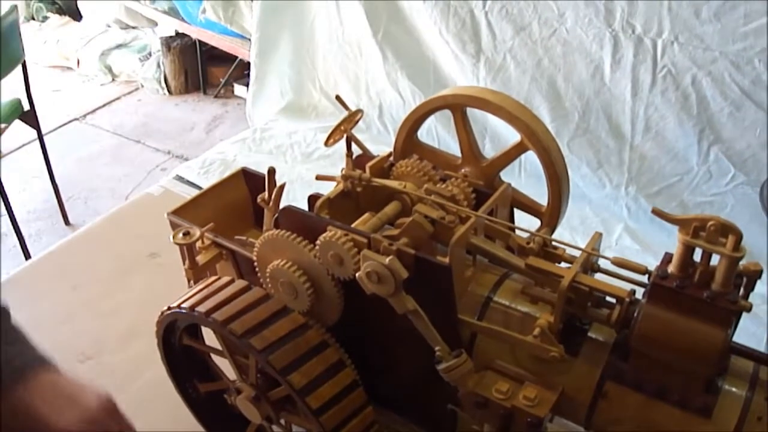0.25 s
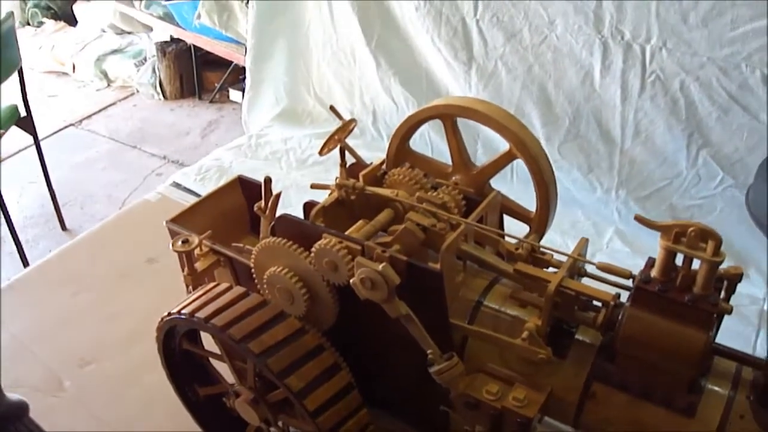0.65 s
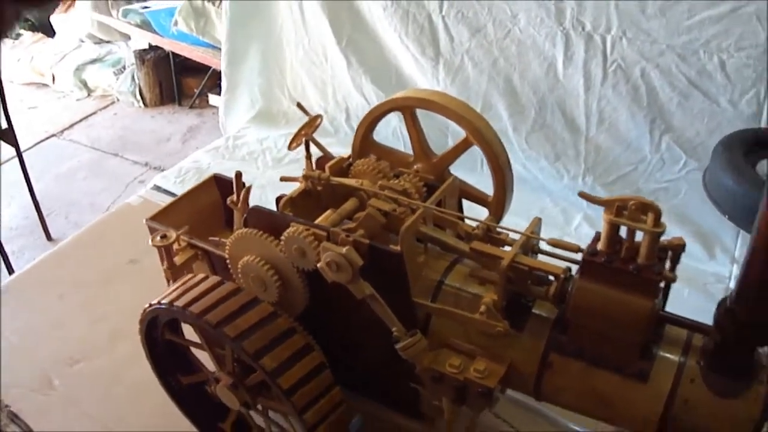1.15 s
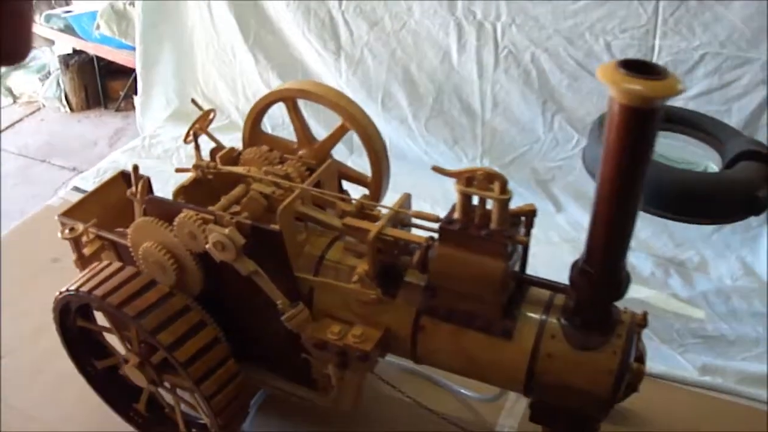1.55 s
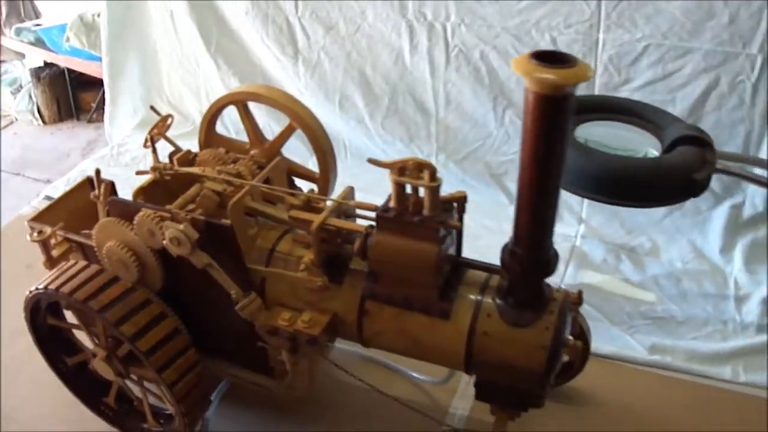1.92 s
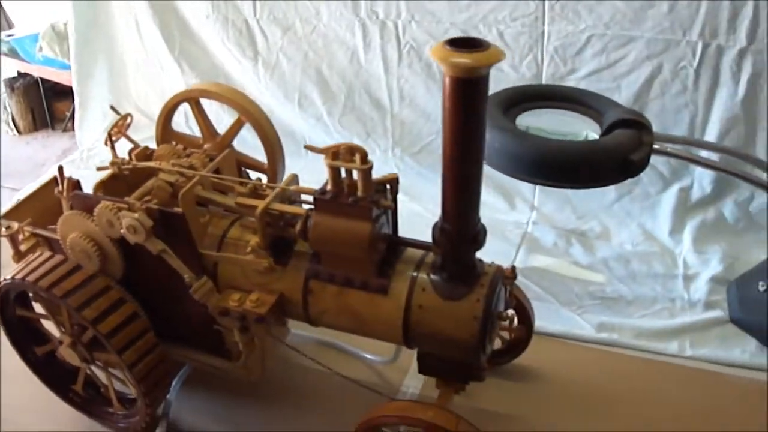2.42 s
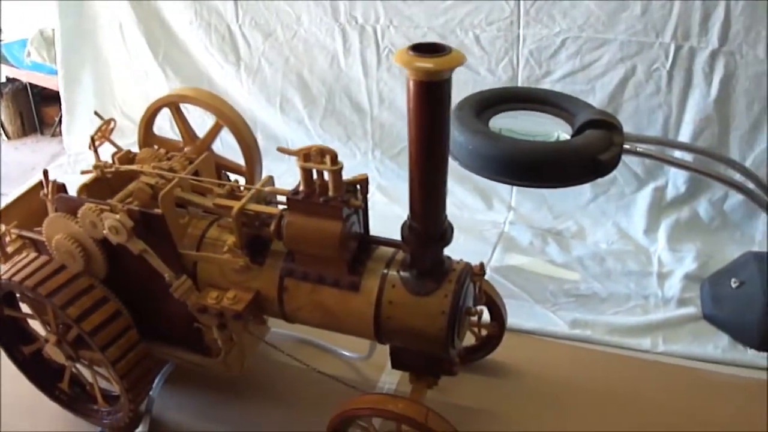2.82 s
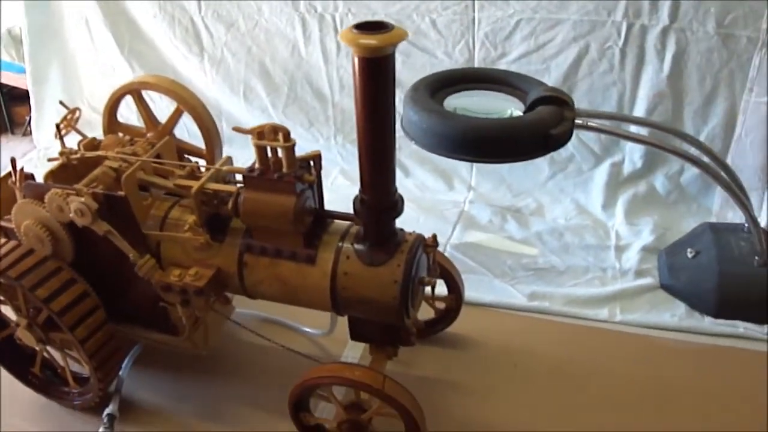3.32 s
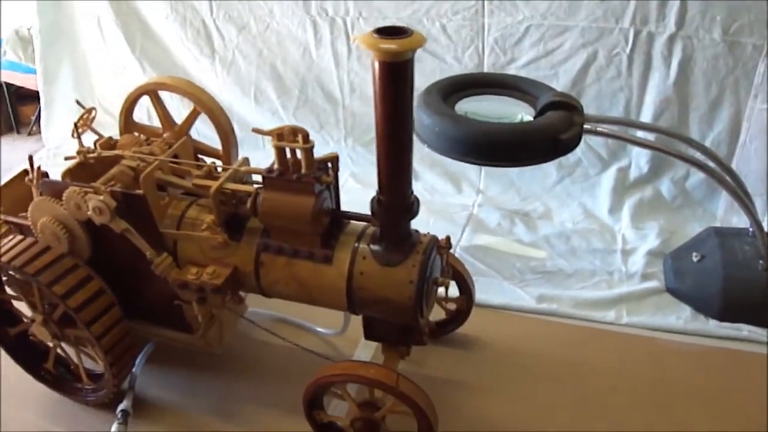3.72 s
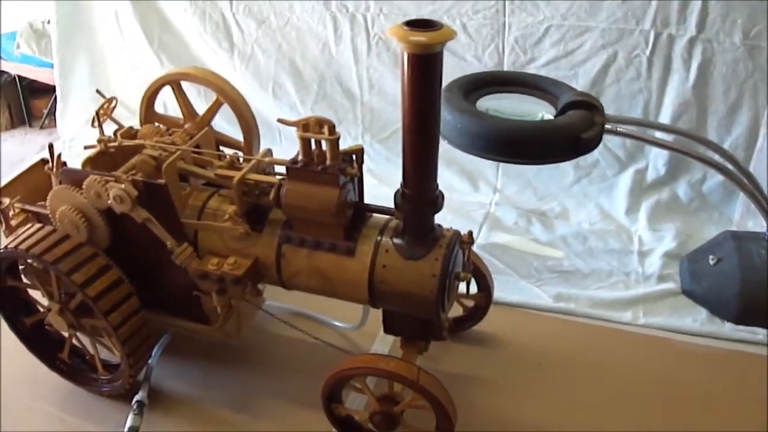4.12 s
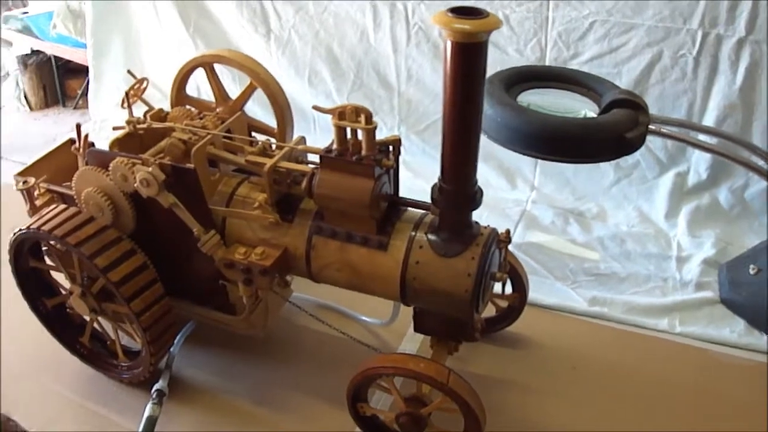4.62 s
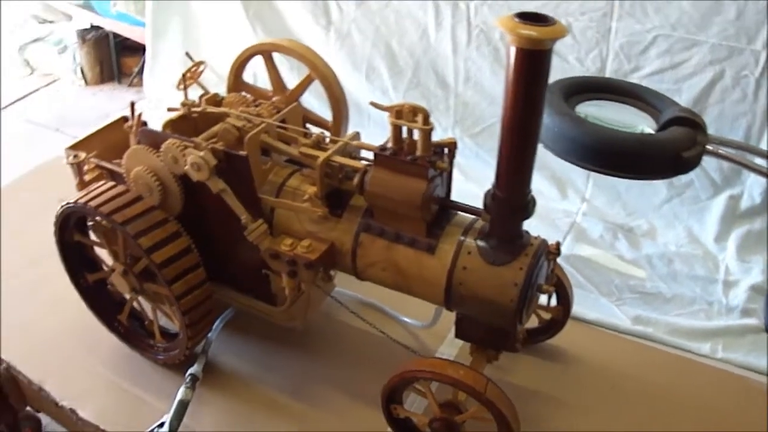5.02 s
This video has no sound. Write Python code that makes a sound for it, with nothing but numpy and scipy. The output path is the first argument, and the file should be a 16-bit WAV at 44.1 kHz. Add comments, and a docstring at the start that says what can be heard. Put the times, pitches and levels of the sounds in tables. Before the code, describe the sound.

Wooden model engine clicks and knocks under the hand while compressed air hisses in uneven bursts, ending with one loud ragged exhaust puff.

```python
"""Wooden traction engine on compressed air

A wooden model engine is worked by hand in a small workshop.
Air: a steady leak, uneven valve bursts, short spits and one exhaust puff, all shaped noise.
Wood: knocks are impact-plus-chatter forces, rubs are stick-slip grains, both ringing frame resonances.
One jolt booms the table, a decaying sine; room reflections and a faint noise floor lie behind."""
import sys
import numpy as np
from scipy import signal
from scipy.fft import rfft, irfft
from scipy.io import wavfile

SR = 44100
rng = np.random.default_rng(int(sys.argv[2]) if len(sys.argv) > 2 else 0)


def unload_audio(sound):
    """Save the sound as a 16-bit wav file, at the path given as the first command line argument."""
    columns = np.transpose(np.atleast_2d(sound))
    # keep every value between -1 and 1, then stretch to whole-number steps
    steps = np.round(np.clip(columns, -1, 1) * 32767)
    wavfile.write(sys.argv[1], SR, steps.astype(np.int16))


N = 231910
TIME = np.arange(N) / SR


def from_db(db):
    """Decibels to amplitude gain."""
    return 10 ** (np.asarray(db) / 20)


def rms_one(x):
    """Scale to unit rms."""
    return x / np.sqrt(np.mean(x ** 2) + 1e-20)


def decay(t, t60_s):
    """Exponential fall of 60 dB in t60_s."""
    return np.exp(-np.log(1000) * t / t60_s)


def rise(t, rise_s):
    """Exponential approach to 1 with time constant rise_s."""
    return 1 - np.exp(-t / rise_s)


def level(rows):
    """Gain along a (time_s, level_db) curve."""
    time_s, level_db = np.transpose(rows)
    return from_db(np.interp(TIME, time_s, level_db))


def drift(knots_per_s):
    """Smooth random wander of unit rms."""
    knots = rng.standard_normal(N // 20)
    return rms_one(np.interp(TIME * knots_per_s, np.arange(len(knots)), knots))


def noise(colour):
    """Unit-rms noise with a spectrum interpolated over log frequency."""
    freq_hz, density_db = np.transpose(colour)
    bins_hz = np.maximum(np.arange(N // 2 + 1) * SR / N, 1)
    gain = from_db(np.interp(np.log(bins_hz), np.log(freq_hz), density_db))
    return rms_one(irfft(rfft(rng.standard_normal(N)) * gain, N))


def band(x, low_hz, high_hz, order=2):
    """Causal Butterworth band-pass."""
    high_hz = min(max(high_hz, low_hz * 1.1), SR * .45)
    sos = signal.butter(order, [low_hz, high_hz], "band", fs=SR, output="sos")
    return signal.sosfilt(sos, x)


def ring(x, freq_hz, t60_s):
    """Two-pole resonator: a unit click starts a decaying sine of height 1."""
    radius = from_db(-60 / (t60_s * SR))
    angle = 2 * np.pi * freq_hz / SR
    poles = [1, -2 * radius * np.cos(angle), radius * radius]
    return signal.lfilter([0, np.sin(angle)], poles, x + 1e-18)


def add(track, start_s, sound):
    """Mix a sound in at a time."""
    start = max(0, round(start_s * SR))
    track[start:start + len(sound)] += sound[:N - start]


def stroke(t, length_s):
    """Rounded swell centred on half of length_s."""
    return np.exp(-np.minimum(np.abs(2 * t / length_s - 1) ** 4, 50))


# wooden frame resonances: freq_hz, level_db (before ring_db), t60_s
FRAME_MODES = [(267, -32.5, 0.02), (479.4, -32.5, 0.16), (627, -24, 0.055), (850, -30, 0.076),
               (1095, -25, 0.019), (1450, -13, 0.0073), (1600, -20.5, 0.044), (2270, -57, 0.051),
               (3120, -17.5, 0.039), (4140, -5.5, 0.013)]


def frame(force, ring_db=-22):
    """A contact force is heard directly and through the frame modes, each varied about 1 dB per contact."""
    modes = sum(from_db(level_db + rng.normal(0, 1)) * ring(force, freq_hz, t60_s)
                for freq_hz, level_db, t60_s in FRAME_MODES)
    return force + from_db(ring_db) * modes


def blow(low_hz, high_hz, t60_s, crack_db=-21, chatter_db=2.0, thud_db=-25, settle_s=0.003):
    """One impact plus dying chatter drives the frame; part size sets the band heard."""
    t = TIME[:SR // 4]
    chatter = rng.standard_normal(len(t)) * decay(t, t60_s) * rise(t, settle_s)
    looseness = np.sqrt(t60_s / 0.025) * (1 + high_hz / 6000)  # small or long-ringing parts chatter most
    force = looseness * from_db(chatter_db) * chatter / np.linalg.norm(chatter)
    force[0] += 1
    wood = frame(force)
    body = rms_one(band(wood, low_hz, high_hz, order=3))
    crack = from_db(crack_db) * rms_one(band(wood, 580, 4300, order=1))
    size = min(1, 250 / low_hz) ** 2  # big parts shake the table
    thud = from_db(thud_db) * size * rms_one(band(force, 81, 130))
    sound = body + crack + thud
    return sound / np.linalg.norm(sound) * np.sqrt(SR / 100)  # unit rms if packed into 10 ms


KNOCK_SPREAD = 1.554  # band: pitch / spread to pitch * spread
THUMP_LOW_HZ, THUMP_HIGH_HZ, THUMP_T60_S = 209, 505, 0.048
REBOUND_S, REBOUND_DB, REBOUND_PITCH = 0.033, -8, .7  # delay, level re thump, band ratio
# wood striking wood: start_s, level_db, pitch_hz, chatter_t60_s,
# thump_db (re blow), crack_db (re the blow's pitched band)
KNOCK_EVENTS = [ (0.0182, -27.5, 1550, 0.0061, -18, -43), (.195, -22.5, 1940, 0.0056, -5.5, 10.5),
                (.207, -26.5, 9050, 0.01, -20, -18), (0.2142, -27.5, 5700, .01, -18, -21),
                (0.3013, -25, 1020, .022, -11.5, -8), (.303, -18, 2240, 0.0074, -23, -13),
                (0.4758, -38, 864, 0.061, -18, -1), (.677, -37.5, 860, 0.14, -13, -10),
                (0.8828, -40, 2100, 0.023, -18, -17), (1.008, -41, 1110, 0.031, -18, -18),
                (1.0921, -36.5, 370, 0.022, 1.5, -15), (1.162, -38, 344, .025, -6, -15),
                (1.273, -31, 2220, .022, -17, 17), (1.283, -25, 1100, 0.022, -9, -14),
                (1.822, -41, 1480, .005, -13, -4), (1.851, -32.5, 1145, 0.01, -12, -2.5),
                (2.263, -19, 1640, 0.015, -4, -7), (2.271, -21, 1330, 0.17, -15, -28),
                (2.2939, -18.5, 660, 0.011, -13, -12), (2.3052, -19.5, 555, 0.0076, -6.5, -27),
                (2.3144, -22.5, 910, 0.012, -22, -21), (2.3444, -26.5, 327, 0.062, -9, -21),
                (2.755, -34.5, 476, 0.038, -6, -20), (2.9259, -29, 760, 0.016, 3, -1),
                (3.0844, -21, 620, 0.018, -10.5, -11.5), (3.0918, -20, 800, 0.021, -24, -5),
                (3.1882, -40, 3300, .006, -7, -10), (3.2115, -17.5, 1020, 0.0092, -7.5, -15),
                (3.253, -26, 616, .035, -18, -17), (3.649, -23, 1300, 0.048, -7.5, -2.5),
                (4.3005, -24.5, 810, 0.014, -19.5, -9), (4.3026, -28, 3300, 0.0059, -25, -10),
                (4.435, -31, 850, 0.067, -11, -24), (4.506, -33.5, 1750, 0.017, -22, 9),
                (4.546, -34, 656, 0.055, -18, -19)]


def knocks():
    """A struck part sounds in its band and thumps the frame; longer-ringing parts drop back harder."""
    out = np.zeros(N)
    for start_s, level_db, pitch_hz, t60_s, thump_db, crack_db in KNOCK_EVENTS:
        hit = blow(pitch_hz / KNOCK_SPREAD, pitch_hz * KNOCK_SPREAD, t60_s, crack_db)
        add(out, start_s, from_db(level_db) * hit)
        thump = blow(THUMP_LOW_HZ, THUMP_HIGH_HZ, THUMP_T60_S)
        add(out, start_s, from_db(level_db + thump_db) * thump)
        rebound_gain = from_db(level_db + thump_db + REBOUND_DB) * min(1, t60_s / THUMP_T60_S)
        rebound = blow(THUMP_LOW_HZ * REBOUND_PITCH, THUMP_HIGH_HZ * REBOUND_PITCH, THUMP_T60_S)
        add(out, start_s + REBOUND_S, rebound_gain * rebound)
    return out


RUB_SPREAD = 1.84  # band: pitch / spread to pitch * spread
# wood sliding on wood: start_s, length_s, level_db, pitch_hz
RUB_EVENTS = [(0.895, 0.04, -39.5, 2940), (.92, 0.034, -36, 3250), (0.946, 0.3, -49, 775),
              (2.24, 0.17, -49.5, 108), (2.275, 0.096, -30.5, 1190), (2.542, .042, -28.5, 940),
              (2.971, 0.063, -44.5, 730), (3.096, 0.014, -33.5, 860), (3.214, 0.027, -32.5, 480),
              (3.227, 0.051, -35.5, 1140), (3.272, 0.098, -42, 1190), (3.569, 0.07, -43, 700),
              (3.652, .033, -34, 2070), (3.678, 0.11, -41, 1420), (4.129, 0.033, -39.5, 2040),
              (4.234, .13, -39.5, 780), (4.283, 0.046, -34.5, 3420), (4.3, .04, -36, 760),
              (4.335, 0.044, -48.5, 140), (4.458, 0.23, -43, 1130), (4.569, 0.059, -41, 3000)]


def rubs(slips_per_s=2400, unevenness_db=2.0, grit_db=-14):
    """Stick-slip: dense uneven grains drive the frame, with a little broad grit."""
    out, t = np.zeros(N), TIME[:SR // 2]
    for start_s, length_s, level_db, pitch_hz in RUB_EVENTS:
        slips = (rng.random(len(t)) < slips_per_s / SR) * rng.standard_normal(len(t))
        slips = slips * from_db(unevenness_db * rng.uniform(-1, 1, len(t)))
        wood = frame(slips * stroke(t, length_s))
        body = rms_one(band(wood, pitch_hz / RUB_SPREAD, pitch_hz * RUB_SPREAD))
        grit = from_db(grit_db) * rms_one(band(wood, 250, 3000, order=1))
        sound = body + grit
        sound = sound / (np.linalg.norm(sound) + 1e-9) * np.sqrt(length_s * SR)
        add(out, start_s, from_db(level_db) * sound)
    return out


def table_boom(start_s=1.288, pitch_hz=89, level_db=-31.5, t60_s=0.36, rise_s=0.0059):
    """The jolt of the opening valve sets the table top swinging: one decaying low sine."""
    out, t = np.zeros(N), TIME[:SR]
    swing = np.sin(2 * np.pi * pitch_hz * t) * decay(t, t60_s) * rise(t, rise_s)
    add(out, start_s, from_db(level_db) * swing)
    return out


def cavity(x, freq_hz, lift_db, q=9.0):
    """A hollow lifts (or dips) the band around its resonance."""
    return x + (from_db(lift_db) - 1) * signal.lfilter(*signal.iirpeak(freq_hz, q, fs=SR), x)


def opening(start_s, attack_s, hold_s, release_s, sag_db_per_s=0):
    """Port flow: opens linearly, sags while held, dies away once shut."""
    t = TIME - start_s
    attack = np.clip(t / attack_s, 0, 1)
    sag = from_db(-sag_db_per_s * np.clip(t, 0, hold_s))
    release = np.exp(-np.clip((t - hold_s) / release_s, 0, 20))
    return attack * sag * release


# valve bursts: start_s, hold_s, hiss_db (before air_db), rush_db (re hiss),
# sag_db_per_s, attack_s, release_s
VALVE_BURSTS = [(0, 0.24, -37.5, 0.5, 30.5, 0.029, 0.067), (1.325, 0.33, -23, -4, 22.5, 0.037, 0.029),
                (1.873, .43, -33, -2, 2, 0.021, 0.083), (2.439, .45, -32, -0.5, 2, 0.082, 0.0093)]
# cavity pair per burst, set by valve position: lower_hz, lower_db, upper_hz, upper_db
BURST_CAVITIES = [(416, 10.5, 1890, 9.5), (1410, 7, 2730, 7.5), (814, 4, 1100, -1.5), (650, 6.5, 1520, 8)]
# short air spits: start_s, length_s, hiss_db (before air_db), rush_db (re hiss)
AIR_SPITS = [(0.492, 0.032, -44, -3.5), (1.272, 0.077, -33.5, -7.5), (1.908, 0.041, -28.5, -14),
             (2.195, 0.099, -30.5, 1), (2.39, 0.043, -37.5, 3), (2.542, 0.039, -30.5, 0),
             (2.922, 0.04, -30, -0.5), (3.096, 0.039, -34, -7.5), (3.248, 0.016, -42, 4.5),
             (3.414, 0.039, -38, 0)]
# bright hiss spectrum at the gap: freq_hz, density_db (relative)
HISS_COLOUR = [(2500, -40), (3800, -2.5), (4850, 2), (5600, 0), (6500, 1), (7700, -2.5), (9300, -1.5),
               (11000, -6)]
# hollow rush spectrum behind the gap: freq_hz, density_db (relative)
RUSH_COLOUR = [(60, -24.5), (250, -14.5), (450, -8), (700, -6), (1100, 1.5), (1450, -3.5), (1800, -6.5),
               (2200, 0), (2700, -2), (3300, -1.5), (4200, -21.5)]


def valve_air(flutter_db=0.62, sputter_db=1.22, hollow_flutter_db=1.7):
    """Turbulent jets: bright hiss at the gap, hollow rush from the wooden cavities behind it."""
    hiss = noise(HISS_COLOUR)
    rush = noise(RUSH_COLOUR) * from_db(hollow_flutter_db * drift(81))
    air = np.zeros(N)
    for burst, (lower_hz, lower_db, upper_hz, upper_db) in zip(VALVE_BURSTS, BURST_CAVITIES):
        start_s, hold_s, hiss_db, rush_db, sag_db_per_s, attack_s, release_s = burst
        hollow = rms_one(cavity(cavity(rush, lower_hz, lower_db), upper_hz, upper_db))
        flow = from_db(hiss_db) * opening(start_s, attack_s, hold_s, release_s, sag_db_per_s)
        air = air + flow * (hiss + from_db(rush_db) * hollow)
    hiss, rush = noise(HISS_COLOUR), noise(RUSH_COLOUR)  # the spits are jets of their own
    for start_s, length_s, hiss_db, rush_db in AIR_SPITS:
        flow = from_db(hiss_db) * stroke(TIME - start_s, length_s)
        air = air + flow * (hiss + from_db(rush_db) * rush)
    return air * from_db(flutter_db * drift(60) + sputter_db * drift(700))


PUFF_S, PUFF_ATTACK_S, PUFF_HOLD_S, PUFF_RELEASE_S = 4.753, .004, 0.076, 0.019
PUFF_DB, PUFF_SWELL_DB_PER_S = -17.5, 38
DRAIN_DB, DRAIN_S = -7, 0.06  # slower-dying part of the flow
# exhaust spectrum: freq_hz, density_db (relative)
EXHAUST_COLOUR = [(80, -50), (200, -11), (320, -5), (430, -12), (620, -1), (800, -8.5), (1050, 0),
                  (1500, 4), (1900, -3), (3100, -0.5), (4700, -2), (6500, -11), (9000, -15), (11000, -21)]


def exhaust(sputter_db=1.6, thump_db=-24, thud_db=-36,
            clack_after_s=0.029, clack_db=-18, clack_hz=1200, clack_t60_s=0.0104):
    """The cylinder empties in one ragged puff; the piston thumps, then clacks against its rod."""
    flow = sum(gain * opening(PUFF_S, PUFF_ATTACK_S, PUFF_HOLD_S, release_s, -PUFF_SWELL_DB_PER_S)
               for gain, release_s in ((1, PUFF_RELEASE_S), (from_db(DRAIN_DB), DRAIN_S)))
    jet = noise(EXHAUST_COLOUR) * from_db(sputter_db * drift(400))
    out = from_db(PUFF_DB) * flow / flow.max() * jet
    thump = blow(THUMP_LOW_HZ, THUMP_HIGH_HZ, THUMP_T60_S, thud_db=thud_db)
    add(out, PUFF_S + PUFF_ATTACK_S, from_db(thump_db) * thump)
    clack = blow(clack_hz / KNOCK_SPREAD, clack_hz * KNOCK_SPREAD, clack_t60_s)
    add(out, PUFF_S + clack_after_s, from_db(clack_db) * clack)
    return out


# leak level curve: time_s, level_db
LEAK_LEVEL = [(0, -42), (.6, -47), (3.15, -45), (3.35, -42), (4.1, -43), (4.4, -39.5), (5.26, -42)]
# leak spectrum: freq_hz, density_db (relative)
LEAK_SPECTRUM = [(300, -22), (1200, -8.5), (2200, -13.5), (3100, -7), (4050, -1), (4850, 1.5), (5600, 0),
                 (6600, -2.5), (7300, -7), (8300, -4.5), (9300, -1.5), (10200, -4.5), (11000, -10.5)]


def leak(flutter_db=2.2, whistle_hz=4760, whistle_db=4.0):
    """Thin fluttering line hiss, lifted at the gap's resonance and its octave."""
    hiss = cavity(noise(LEAK_SPECTRUM), whistle_hz, whistle_db, q=21.0)
    hiss = cavity(hiss, 2 * whistle_hz, whistle_db / 2, q=22.0)
    return level(LEAK_LEVEL) * rms_one(hiss) * from_db(flutter_db * drift(23))


# bounces off the table and the boiler: delay_s, gain (before power normalising)
NEAR_BOUNCES = [(.0016, 0.098), (.0031, 0.03), (.0052, -0.24), (.0083, -0.063)]


def bounced(x):
    """Near surfaces comb the sound of the air."""
    echoes = sum(gain * np.interp(TIME - delay_s, TIME, x, left=0) for delay_s, gain in NEAR_BOUNCES)
    return (x + echoes) / np.sqrt(1 + sum(gain ** 2 for _, gain in NEAR_BOUNCES))


ROOM_T60_S, WALL_CUT_HZ = 0.45, 3000


def workshop(x, build_s=0.0041):
    """Dull diffuse reflections: convolution with band-limited noise that builds up and dies away."""
    t = TIME[:SR]
    tail = band(rng.standard_normal(SR), 133, WALL_CUT_HZ, order=1) * decay(t, ROOM_T60_S)
    tail = tail * rise(t, build_s)
    return signal.fftconvolve(x, tail / np.linalg.norm(tail))[:N]


# room noise spectrum: freq_hz, density_db (relative)
ROOM_SPECTRUM = [(25, -33), (60, -18), (130, -1.5), (330, 3.5), (550, 7.5), (950, 4), (1500, -1),
                 (2500, -1.5), (6000, -7)]


def room_noise(level_db=-47.5):
    """Faint steady noise of the room."""
    return from_db(level_db) * noise(ROOM_SPECTRUM)


def scene(air_db=1.0, air_echo_db=-16, wood_echo_db=-16.5):
    """Wood and air in the room; the jets, aimed away, stir it slightly more. air_db trims the valve."""
    air = bounced(from_db(air_db) * valve_air() + exhaust() + leak())
    wood = knocks() + rubs() + table_boom()
    room = workshop(from_db(air_echo_db) * air + from_db(wood_echo_db) * wood)
    return (air + wood + room + room_noise())[None]


RUMBLE_CUT_HZ, CUTOFF_HZ = 52, 11050


def record(dry):
    """The microphone loses the deepest bass; the top is cut steeply."""
    high_pass = signal.butter(2, RUMBLE_CUT_HZ, "high", fs=SR, output="sos")
    low_pass = signal.ellip(12, .2, 80, CUTOFF_HZ, fs=SR, output="sos")
    return signal.sosfilt(low_pass, signal.sosfilt(high_pass, dry))


dry = scene()
out = record(dry)
unload_audio(out)
```